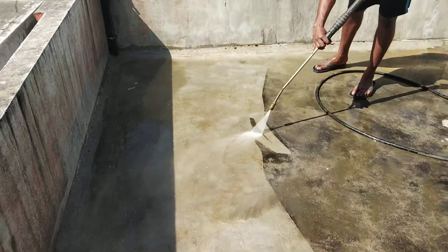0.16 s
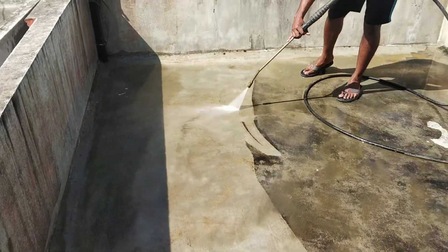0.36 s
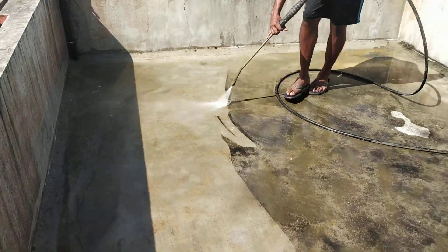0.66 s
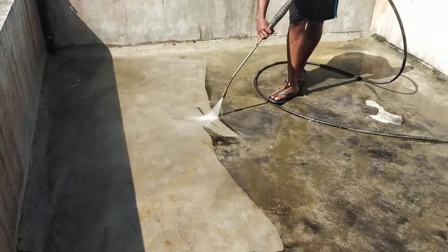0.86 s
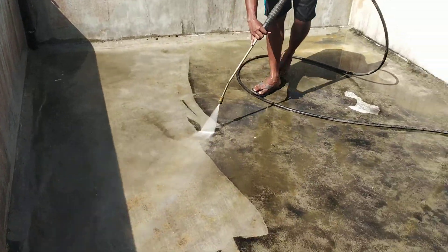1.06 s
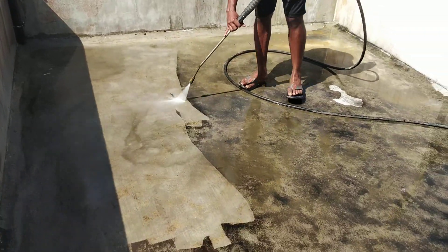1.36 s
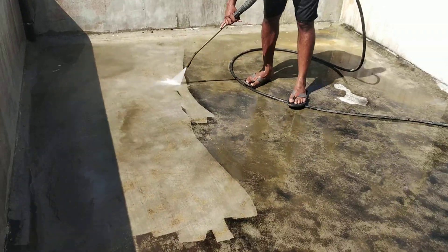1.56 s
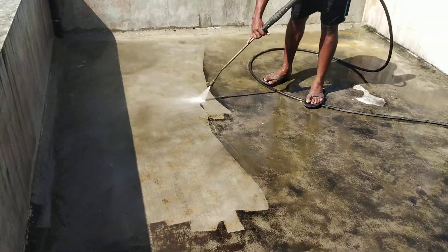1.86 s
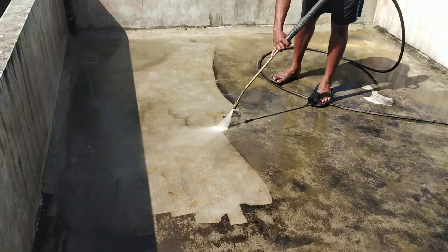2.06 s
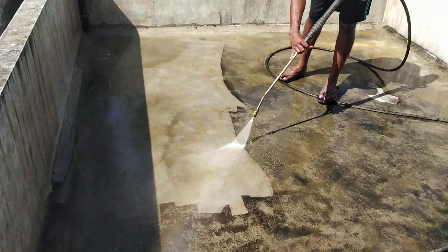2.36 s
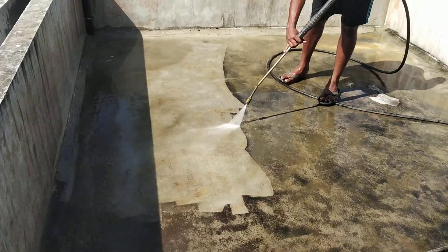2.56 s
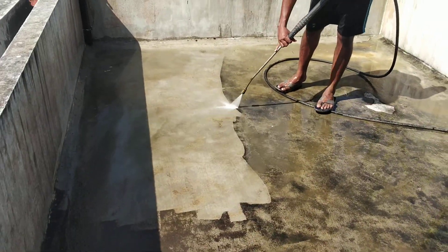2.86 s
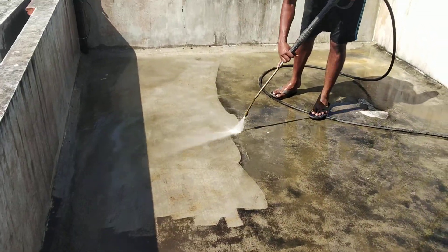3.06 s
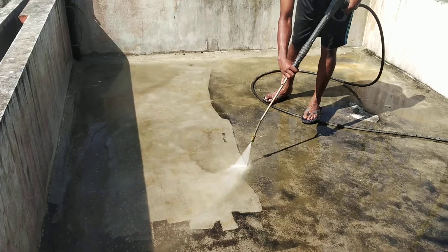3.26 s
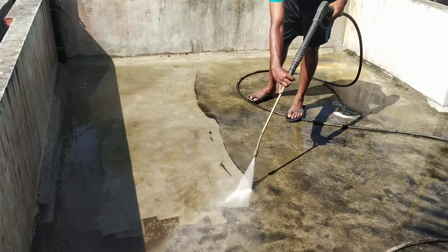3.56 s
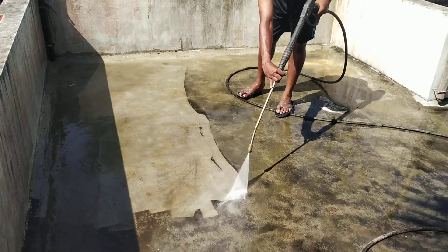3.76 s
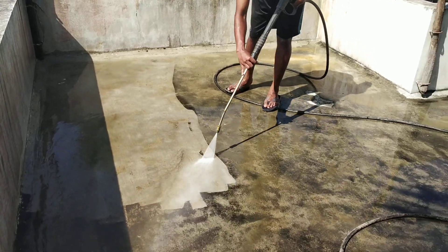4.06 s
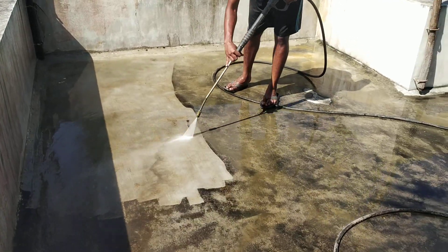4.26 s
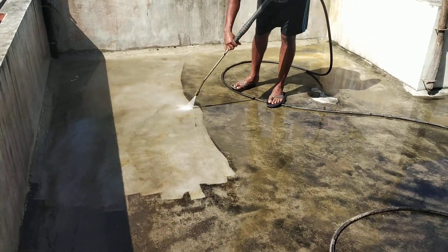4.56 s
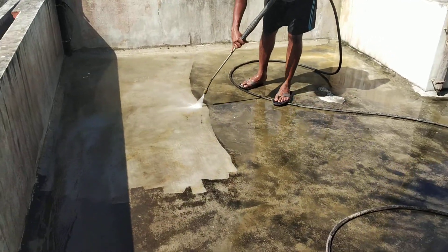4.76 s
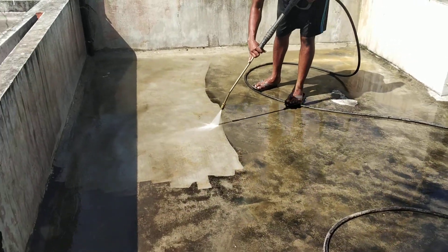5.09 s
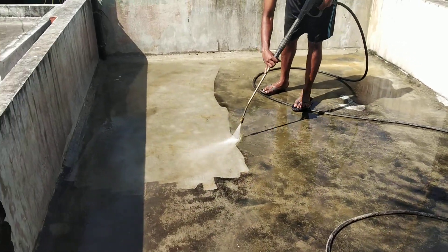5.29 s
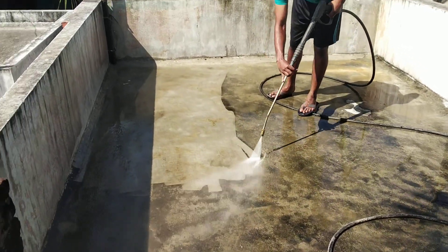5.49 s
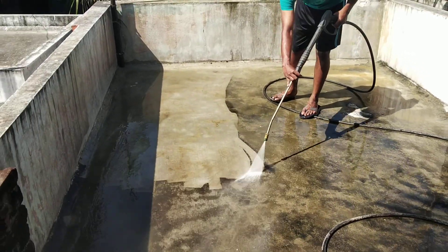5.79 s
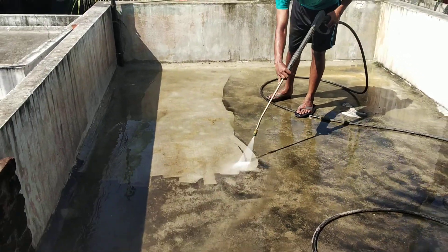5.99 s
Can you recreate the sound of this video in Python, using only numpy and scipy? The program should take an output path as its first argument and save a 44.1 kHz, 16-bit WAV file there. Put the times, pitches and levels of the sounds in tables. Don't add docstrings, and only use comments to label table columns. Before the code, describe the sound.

Steady outdoor water-jet spray on a hard slab, bright hiss over a coarse roar, surging in slow sweeps above a barely audible low hum.

```python
import sys
import numpy as np
from scipy import signal
from scipy.io import wavfile
from scipy.ndimage import uniform_filter1d, map_coordinates

SR = 44100
rng = np.random.default_rng(int(sys.argv[2]) if len(sys.argv) > 2 else 0)


def wav_record(signal):
    frames = np.transpose(np.atleast_2d(signal))
    bounded = np.clip(frames, -1, 1)
    quanta = np.round(bounded * 32767).astype(np.int16)
    wavfile.write(sys.argv[1], SR, quanta)


def convert_level_to_amplitude(level_db):
    exponent = np.asarray(level_db, float) / 20
    return 10 ** exponent


N = 270333
FRAME = 1024


def along(points, hz):
    f, v = np.transpose(points)
    return np.interp(np.log(hz + 1), np.log(f + 1), v)


def curves(rows, t):
    s, *cols = np.transpose(rows)
    return [np.interp(t, s, c) for c in cols]


def wobble(rate, t):
    return map_coordinates(rng.standard_normal(800), [t * rate])


def noise(count):
    return signal.stft(rng.standard_normal((count, N)), SR, nperseg=FRAME, noverlap=FRAME * 3 // 4)


def late(hz, micros):
    return np.exp(-2j * np.pi * hz * micros * 1e-6)


def drifting(shape, bins, steps):
    field = rng.standard_normal((*shape[:-1], shape[-1] // 4 + 1))
    for _ in range(2):
        field = uniform_filter1d(field, size=bins, axis=-2)
        field = uniform_filter1d(field, size=steps, axis=-1)
    return np.repeat(field / np.std(field), 4, axis=-1)[..., :shape[-1]]


def layer(spectrum, hz, level_db, tilt_db, low_hz, high_hz):
    shape = convert_level_to_amplitude(along(spectrum, hz))
    lower = along([(low_hz, 1), (high_hz, 0)], hz)
    return shape / np.sqrt(np.mean(shape ** 2)) * convert_level_to_amplitude(level_db + lower * (tilt_db - np.mean(tilt_db)))


# time in seconds, level in dB.
STRIKE_ROAR = [(0, -31), (.8, -32.5), (1.15, -30.5), (1.3, -31.5), (1.47, -34.5), (2.02, -34),
               (2.25, -27.5), (2.5, -31.5), (2.9, -34), (3.3, -30), (3.45, -30.5), (3.76, -26.5),
               (4.2, -31.5), (4.6, -35.5), (5.25, -32.5), (5.6, -29.5), (5.85, -26.5), (6.13, -32.5)]
# time in seconds, delay between the ports in microseconds.
SWEEP_BEARING = [(0, -212), (.4, -152), (.6, -164), (1.0, -111), (1.4, -66), (1.65, -70), (2.15, -165),
                 (2.4, -167), (2.8, -152), (3.45, -177), (3.85, -158), (4.2, -98), (4.55, -95), (5.0, -127),
                 (5.5, -186), (5.8, -195), (6.13, -178)]
# time in seconds, extra bass in dB, half length in seconds.
PUDDLES_HIT = [
    (1.15, 3.5, 0.132),
    (1.612, 5, 0.202),
    (3.353, 1, 0.2),
    (4.2, 0.5, 0.077),
    (6.05, 3.5, 0.138),
]
FIZZ_DB, FIZZ_FOLLOWS, FIZZ_TURNS = -20.5, 0.167, -0.15
BASS_FOLLOWS, BASS_TURNS, BASS_SLOSH_DB = 0.714, 0.26, 1.42
HISS_FOLLOWS, HISS_TURNS = 0.635, 0.43
PAN_FOLLOWS, PAN_TURNS = -0.513, -0.73
WALLS_DB, WALLS_FOLLOW, WALLS_TURN, WALLS_FADE_DB_PER_S = 1.2, -0.68, 0.85, 0.58


def swing(t):
    roar_db, = curves(STRIKE_ROAR, t)
    bearing, = curves(SWEEP_BEARING, t)
    near = roar_db - np.mean(roar_db)
    turn = (bearing - np.mean(bearing)) / 100
    bass_db = BASS_FOLLOWS * near + BASS_TURNS * turn + BASS_SLOSH_DB * wobble(14, t)
    bass_db = bass_db + sum(db * np.exp(-((t - s) / half) ** 2) for s, db, half in PUDDLES_HIT)
    fizz_db = FIZZ_DB + FIZZ_FOLLOWS * near + FIZZ_TURNS * turn
    hiss_db = HISS_FOLLOWS * near + HISS_TURNS * turn
    pan_db = PAN_FOLLOWS * near + PAN_TURNS * turn
    far_db = WALLS_DB + WALLS_FOLLOW * near + WALLS_TURN * turn - WALLS_FADE_DB_PER_S * (t - np.mean(t))
    return roar_db, bass_db, fizz_db, hiss_db, pan_db, bearing, far_db


def port(paths, hz, lag):
    first, *bent = [gain * late(hz, micros + share * lag) for gain, micros, share in paths]
    return first + along([(600, 0), (1500, 0.787)], hz) * sum(bent)


def parapets(shape):
    real, imaginary = drifting((2, 2, *shape), bins=3, steps=7)
    return (real + 1j * imaginary) / np.sqrt(2)


# start in seconds, length in seconds, from in Hz, to in Hz, depth in dB.
GLIDING_BANDS = [(0, .08, 9200, 8900, 7), (.08, .12, 7600, 7800, 11), (.05, .7, 5200, 5350, 5),
                 (.4, .25, 8050, 8000, 6), (.85, .2, 14300, 13200, 5), (.75, .55, 2800, 3150, 8),
                 (.95, .35, 7800, 7300, 8), (1.06, .12, 11700, 11800, 11), (1.15, .35, 12200, 12350, 7),
                 (1.33, .3, 9700, 9400, 8), (1.5, .25, 9900, 10300, 8), (1.42, .16, 11200, 11400, 8),
                 (1.33, .3, 6300, 6400, 8), (1.6, .3, 6500, 7300, 8), (1.3, .45, 3400, 3000, 8),
                 (1.78, .28, 3150, 2950, 12), (2.02, .75, 5400, 5550, 7), (2.05, .25, 9000, 9500, 8),
                 (2.3, .22, 10100, 10100, 10), (2.35, .35, 9300, 8900, 6), (2.6, .6, 2900, 2800, 5),
                 (3.06, .1, 5400, 5500, 9), (3.22, .52, 6050, 5900, 12), (3.7, .28, 5800, 5600, 5),
                 (3.23, .6, 9350, 9600, 8), (3.28, .42, 10700, 10450, 9), (3.31, .26, 12050, 12050, 10),
                 (3.55, .55, 13400, 12900, 6), (4.09, .1, 12000, 12100, 11), (4.25, .3, 12800, 12900, 7),
                 (4.08, .55, 7250, 7600, 9), (4.65, .35, 7600, 7700, 7), (4.12, .4, 2850, 3300, 9),
                 (4.45, .3, 3400, 3050, 12), (5.15, .35, 5500, 5700, 9), (5.5, .42, 6200, 6500, 7),
                 (5.65, .3, 7700, 8400, 9), (5.4, .7, 12000, 11700, 7), (5.55, .45, 14900, 13900, 7),
                 (6, .13, 6600, 6300, 5)]
# frequency in Hz, share of the depth.
GLIDING_REACH = [(3000, .28), (5500, .3), (7500, .3), (9500, .7), (13000, 1.0)]
WANDER_HZ = 80


def gliding_nulls(hz, t):
    total_db = np.zeros((len(hz), len(t)))
    edge_s, half_width_hz = .03, 260
    for s, length, from_hz, to_hz, db in GLIDING_BANDS:
        centre = from_hz + (to_hz - from_hz) * (t - s) / length + WANDER_HZ * wobble(16, t)
        outside = np.clip(abs(t - s - length / 2) - length / 2 + edge_s, 0, None) / edge_s
        flicker = np.clip(1 + .3 * wobble(20, t), 0, 2)
        depth_db = db * along(GLIDING_REACH, from_hz) * np.exp(-outside ** 2) * flicker
        now = outside < 3
        total_db[:, now] += depth_db[now] * np.exp(-((hz - centre[now]) / half_width_hz) ** 2)
    return total_db


# start in seconds, length in seconds,
# centre in Hz, width in Hz.
DEEP_GAPS = [(0.1, 0.11, 7790, 500), (0.33, 0.2, 5350, 220), (0.48, 0.11, 8050, 250),
             (0.55, 0.2, 5330, 220), (0.82, 0.2, 7150, 200), (1.07, 0.09, 11720, 370),
             (1.09, 0.09, 2950, 230), (1.17, 0.11, 12250, 230), (1.18, 0.11, 7400, 310),
             (1.35, 0.05, 6380, 370), (1.35, 0.08, 9810, 340), (1.46, 0.1, 3400, 230),
             (1.47, 0.08, 11320, 330), (1.51, 0.08, 6980, 270), (1.52, 0.07, 9340, 310),
             (1.58, 0.06, 10030, 520), (1.7, 0.09, 6750, 400), (1.79, 0.06, 7310, 490),
             (1.84, 0.19, 3100, 260), (2.01, 0.12, 5440, 330), (2.04, 0.15, 9180, 330),
             (2.2, 0.05, 5650, 460), (2.29, 0.06, 9320, 350), (2.3, 0.08, 5450, 350),
             (2.34, 0.04, 9930, 580), (2.37, 0.06, 9200, 420), (2.39, 0.23, 5570, 260),
             (2.42, 0.06, 10070, 620), (2.7, 0.1, 2950, 220), (3.09, 0.05, 5510, 420),
             (3.22, 0.46, 5980, 520), (3.31, 0.04, 10690, 450), (3.32, 0.1, 12030, 280),
             (3.4, 0.07, 10630, 430), (3.46, 0.1, 12030, 320), (3.6, 0.11, 9590, 240),
             (3.61, 0.08, 10500, 330), (4.06, 0.11, 7480, 360), (4.1, 0.07, 12080, 490),
             (4.23, 0.09, 2950, 270), (4.3, 0.11, 12870, 190), (4.88, 0.1, 3050, 240),
             (5.18, 0.12, 9070, 210), (5.25, 0.13, 5550, 340), (5.52, 0.04, 12180, 540),
             (5.58, 0.12, 14900, 340), (5.62, 0.08, 11760, 230), (5.94, 0.06, 13920, 460),
             (6.0, 0.09, 5590, 310), (6.06, 0.05, 6580, 410),
             (4.25, .07, 7150, 330), (4.32, .06, 7400, 250), (4.38, .08, 7450, 800),
                (4.46, .03, 7550, 450), (4.52, .04, 7350, 500), (4.55, .05, 7650, 350),
                (4.46, .03, 3750, 350), (4.48, .03, 3450, 400), (4.51, .09, 3250, 260),
                (4.6, .05, 3150, 520), (4.65, .05, 3000, 220), (5.5, .03, 5850, 500),
                (5.53, .07, 6250, 800), (5.6, .03, 6600, 300), (5.645, .045, 6200, 650),
                (5.69, .07, 6600, 450), (5.715, .025, 7100, 700), (5.76, .07, 6250, 850),
                (5.78, .08, 8600, 450), (5.875, .07, 7900, 450), (5.9, .025, 8400, 700),
                (5.875, .03, 6000, 600), (5.9, .05, 6600, 400)]
# start in seconds, length in seconds, centre in Hz.
BRIEF_GAPS = [(0.08, 0.03, 7530), (0.08, 0.04, 9250), (0.68, 0.05, 5400), (0.95, 0.05, 2690),
              (0.95, 0.07, 13170), (1.03, 0.05, 3650), (1.03, 0.05, 5640), (1.08, 0.04, 7490),
              (1.29, 0.05, 3340), (1.42, 0.03, 12440), (1.48, 0.06, 6230), (1.53, 0.04, 2710),
              (1.6, 0.04, 7710), (1.63, 0.03, 6160), (1.7, 0.05, 2800), (1.92, 0.04, 8150),
              (1.93, 0.06, 7070), (2.18, 0.05, 10640), (2.28, 0.03, 5970), (2.31, 0.05, 2820),
              (2.32, 0.03, 10880), (2.55, 0.09, 8940), (2.65, 0.04, 12770), (2.73, 0.04, 3000),
              (2.95, 0.04, 9430), (3.25, 0.05, 9380), (3.37, 0.07, 9460), (3.44, 0.03, 12220),
              (3.51, 0.06, 9560), (3.56, 0.04, 10690), (3.85, 0.05, 13330), (3.98, 0.08, 13060),
              (4.09, 0.03, 3460), (4.15, 0.07, 2870), (4.19, 0.03, 11820), (4.21, 0.06, 7970),
              (4.34, 0.04, 2930), (4.38, 0.06, 3530), (4.43, 0.04, 12890), (4.68, 0.05, 11800),
              (4.79, 0.05, 7760), (4.8, 0.09, 7210), (4.83, 0.05, 3460), (4.94, 0.04, 3070),
              (4.96, 0.07, 7150), (5.16, 0.06, 6340), (5.36, 0.04, 9780), (5.4, 0.07, 7200),
              (5.41, 0.04, 5700), (5.46, 0.03, 6380), (5.51, 0.04, 9340), (5.55, 0.06, 14010),
              (5.69, 0.05, 8050), (5.72, 0.04, 10090), (5.74, 0.06, 11820), (5.81, 0.05, 15160),
              (5.82, 0.05, 11330), (6.01, 0.07, 10610), (6.01, 0.08, 11700), (6.07, 0.05, 9490),
              (0.0, 0.03, 9100), (0.01, 0.02, 6830), (0.03, 0.03, 5170), (0.09, 0.03, 5130),
                    (0.15, 0.02, 6160), (0.33, 0.03, 5390), (0.38, 0.03, 8010), (0.56, 0.03, 5290),
                    (0.63, 0.03, 5990), (0.72, 0.03, 6780), (0.88, 0.03, 5560), (0.92, 0.04, 7150),
                    (1.01, 0.03, 7190), (1.08, 0.03, 12830), (1.45, 0.03, 9360), (1.45, 0.03, 9860),
                    (1.67, 0.03, 3330), (1.77, 0.03, 3480), (1.83, 0.03, 11760), (1.98, 0.04, 4130),
                    (2.0, 0.02, 12510), (2.19, 0.02, 9500), (2.26, 0.04, 13070), (2.27, 0.04, 10510),
                    (2.28, 0.03, 3010), (2.49, 0.03, 9280), (2.54, 0.04, 10520), (2.82, 0.03, 12560),
                    (2.84, 0.02, 11570), (3.02, 0.03, 6630), (3.14, 0.03, 10640), (3.25, 0.04, 2840),
                    (3.54, 0.04, 12830), (3.76, 0.03, 13370), (3.78, 0.03, 10020), (3.95, 0.04, 13220),
                    (4.09, 0.03, 12660), (4.46, 0.04, 10590), (4.49, 0.03, 11180), (4.65, 0.04, 3470),
                    (4.67, 0.02, 7270), (4.71, 0.03, 3010), (4.71, 0.03, 12660), (4.74, 0.03, 7080),
                    (4.76, 0.02, 7620), (4.81, 0.03, 3300), (4.82, 0.02, 3850), (4.9, 0.03, 3040),
                    (4.98, 0.02, 3340), (5.2, 0.02, 7370), (5.35, 0.03, 12020), (5.44, 0.03, 11540),
                    (5.56, 0.03, 2760), (5.63, 0.04, 8400), (5.65, 0.03, 9160), (5.67, 0.05, 12230),
                    (5.83, 0.03, 7150), (5.91, 0.02, 10280), (6.0, 0.04, 6870), (6.06, 0.03, 10280)]
# frequency in Hz, share of the depth.
GAP_REACH = [(3000, .9), (7000, .9), (10000, 1.2)]


def brief_gaps(sum_db, hz, t):
    wide = [(*row, 19) for row in DEEP_GAPS]
    narrow = [(*row, 260, 18) for row in BRIEF_GAPS]
    edge_s = .008
    for s, length, centre, width, db in wide + narrow:
        outside = np.clip(abs(t - s - length / 2) - length / 2 + edge_s, 0, None) / edge_s
        now = outside < 3
        place = centre + WANDER_HZ / 2 * wobble(16, t[now])
        window = np.exp(-outside[now] ** 2 - (2 * (hz - place) / width) ** 4)
        full_db = db * along(GAP_REACH, centre) * window
        sum_db[:, now] = np.maximum(sum_db[:, now], full_db)
    return sum_db


WEB_DB, WEB_RARE = 12, .8
PORT_WEB_DB, PORT_WEB_RARE = 11, 1.05
NULL_SPILL = .6


def sum_and_difference(ports, hz, t):
    reach = along([(2000, 0), (2700, .6), (5000, .9), (9000, 1.2), (15000, 1.1)], hz)
    port_web = np.clip(drifting(ports.shape, bins=3, steps=2) - PORT_WEB_RARE, 0, None)
    ports = ports * convert_level_to_amplitude(-PORT_WEB_DB * port_web * reach)
    web = drifting(ports.shape, bins=3, steps=3)
    sum_db, gap_db = WEB_DB * np.clip(web - WEB_RARE, 0, None) * reach
    sum_db = brief_gaps(sum_db + gliding_nulls(hz, t), hz, t)
    sinks, closes = convert_level_to_amplitude(-sum_db), convert_level_to_amplitude(-gap_db)
    mid = (ports[0] + ports[1]) / 2 * sinks * np.sqrt(1 + NULL_SPILL * (1 - closes ** 2))
    side = (ports[0] - ports[1]) / 2 * closes * np.sqrt(1 + NULL_SPILL * (1 - sinks ** 2))
    return np.array([mid + side, mid - side])


# frequency in Hz, density in dB per Hz.
SLAB_SPECTRUM = [(18, -72), (30, -52), (86, -38), (112, -17.5), (144, -27.5), (174, -11), (228, -3),
                 (389, -4.5), (571, -13.5), (790, 1.5), (1430, -4), (1870, -3), (2180, 0.5), (2690, -6),
                 (2900, -6.5), (3770, -11.5), (6380, -120)]
# frequency in Hz, density in dB per Hz.
MIST_SPECTRUM = [(2300, -36.5), (2750, -17), (3100, -7), (3700, -8), (4500, -3.5), (5300, -2.5), (5800, -3),
                 (6800, -4.5), (8400, 1), (10000, 0.5), (12500, 1), (14400, 3), (15500, 0), (16000, -5)]
# frequency in Hz, left against right in dB.
PORT_BALANCE = [(60, -1), (500, -1.5), (900, 0.14), (2300, -3), (3000, 1), (4000, -10.5), (5000, -2),
                (5800, -0.5), (6600, 2), (7600, -3), (9000, -1.5), (10500, 4), (12000, 3), (13500, 1.5)]
# frequency in Hz, scattered against straight sound in dB.
WALL_COLOUR = [(30, 1), (70, -3), (130, -6), (300, -10.5), (700, -5), (1400, -1.5), (2300, -4.5), (2800, 5),
               (4000, 4), (5400, 5), (6200, 4), (7600, 2), (9000, 0.5), (12000, 2.5), (15500, 3.5)]
# gain, delay in microseconds, share of the bearing delay.
LEFT_PATHS = [
    (0.9915, 10.24, 1.132),
    (-0.657, 212.5, 1.828),
    (-0.443, 249.9, 1.416),
    (0.15, 455.3, 2.58),
]
# gain, delay in microseconds, share of the bearing delay.
RIGHT_PATHS = [(0.9776, -7, 0.223)]
# frequency in Hz, lead of the left port in radians.
PORT_TWIST = [(600, 0.3263), (900, 0.16), (2300, 0.5), (3000, 0.54), (4000, -1), (5000, 1.4), (5800, 3),
              (6600, 1.5), (7600, 2), (9000, 3), (10500, 3.5), (12000, 3), (13500, 3), (15500, 2.5)]
AHEAD = 165
TOP_HZ = 15950


def jet():
    hz, t, z = noise(count=3)
    hz = hz[:, None]
    roar_db, bass_db, fizz_db, hiss_db, pan_db, bearing, far_db = swing(t)
    surge_db = 0.2 * wobble(36, t) + 0.527 * wobble(38, t)
    roar_db = roar_db + 0.5 + 0.25 * surge_db
    roar = layer(SLAB_SPECTRUM, hz, roar_db, bass_db, low_hz=475, high_hz=778)
    spray_db = fizz_db + 5.4 + surge_db + 0.167 * wobble(34, t)
    spray = layer(MIST_SPECTRUM, hz, spray_db, hiss_db, low_hz=7070, high_hz=9780)
    side = np.array([.5, -.5])[:, None, None]
    panned_spray = spray * convert_level_to_amplitude(side * (pan_db - np.mean(pan_db)))
    colour = np.hypot(roar, panned_spray) * convert_level_to_amplitude(side * along(PORT_BALANCE, hz))
    left = port(LEFT_PATHS, hz, bearing + AHEAD) * np.exp(1j * along(PORT_TWIST, hz))
    right = port(RIGHT_PATHS, hz, bearing + AHEAD)
    walls = convert_level_to_amplitude(along(WALL_COLOUR, hz) + far_db - 1)
    early = np.clip(along([(1200, 0), (3000, .25)], hz), 0, 1)
    copies = parapets(z.shape[1:]) * z[0]
    scattered = np.sqrt(early) * copies + np.sqrt(1 - early) * z[1:]
    straight = np.array([left, right]) * z[0]
    heard = (straight + walls * scattered) / np.sqrt(1.27 + walls ** 2)
    ports = sum_and_difference(colour * heard, hz, t) * (hz < TOP_HZ)
    return signal.istft(ports, SR, nperseg=FRAME, noverlap=FRAME * 3 // 4)[1][:, :N]


# time in seconds, hum in Hz, level in dB.
PUMP_HUM = [
    (0, 121, -69),
    (2, 121.9, -67),
    (3, 122.1, -61.5),
    (5.7, 119.9, -54),
    (5.9, 122.4, -53.5),
    (6.13, 128.9, -48.5),
]


def pump():
    t = np.arange(N) / SR
    hum_hz, hum_db = curves(PUMP_HUM, t)
    turn = 2 * np.pi * np.cumsum(hum_hz + 0.93 * wobble(6.7, t)) / SR
    tones = np.sin(turn) + convert_level_to_amplitude(5 + 2 * wobble(15, t)) * np.sin(turn * 3 / 2)
    return convert_level_to_amplitude(hum_db - 3.0 + 0.94 * wobble(3.8, t)) * tones


# start in seconds, length in seconds, pitch in Hz, level in dB.
STREET_DRONES = [
    (1.4, 0.47, 327.3, -55),
    (2.62, .7, 404.7, -57.5),
    (5.45, 0.316, 496.7, -51),
]
# start in seconds, pitch in Hz, level in dB, t60 in seconds.
HOSE_THUD = (3, 190.5, -34.5, 0.0065)


def street():
    t = np.arange(N) / SR
    out = np.zeros(N)
    for s, length, hz, db in STREET_DRONES:
        swell = np.sin(np.pi * np.clip((t - s) / length, 0, 1)) ** .5
        out += convert_level_to_amplitude(db + 4) * swell * np.sin(2 * np.pi * np.cumsum(hz + 3 * wobble(12, t)) / SR)
    s, hz, db, t60 = HOSE_THUD
    u = np.clip(t - s, 0, None)
    onset = 1 - np.exp(-u / 0.0059)
    return out + convert_level_to_amplitude(db + 8.5 - 60 * u / t60) * onset * np.sin(2 * np.pi * hz * u)


def scene():
    return jet() + pump() + street()


def band_limit(x):
    return signal.sosfilt(signal.butter(12, 15900, fs=SR, output="sos"), x)


def record(dry):
    low_cut = signal.butter(2, 49, "high", fs=SR, output="sos")
    mix = signal.sosfilt(low_cut, dry)
    return band_limit(mix)


dry = scene()
out = record(dry)
wav_record(out)
```